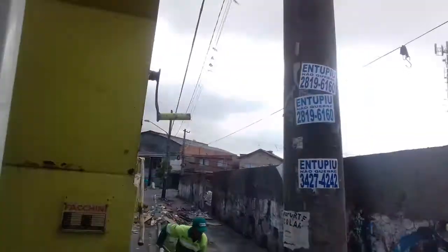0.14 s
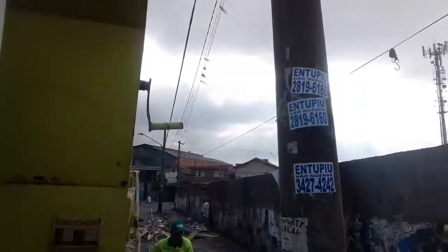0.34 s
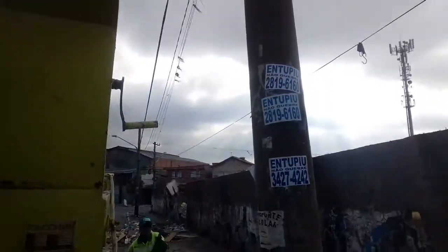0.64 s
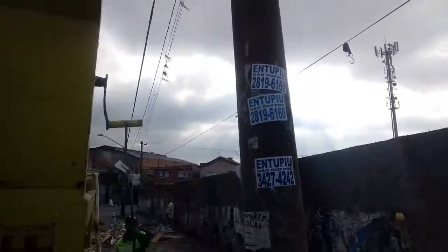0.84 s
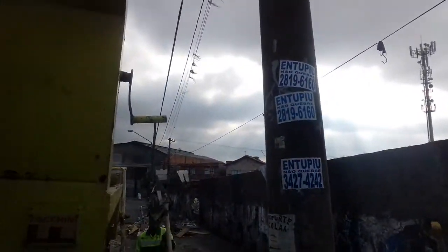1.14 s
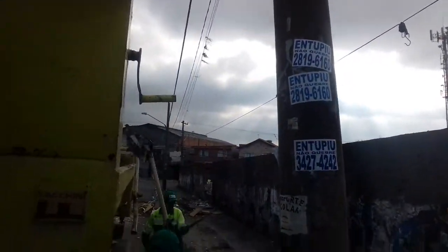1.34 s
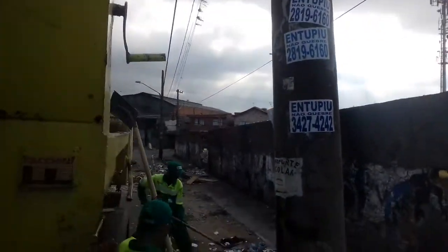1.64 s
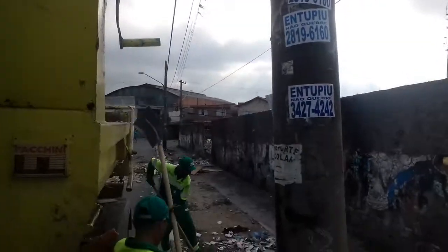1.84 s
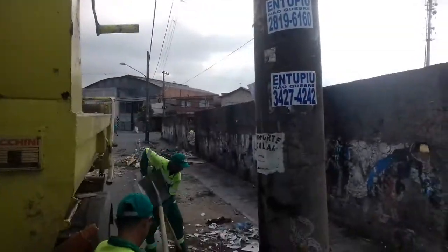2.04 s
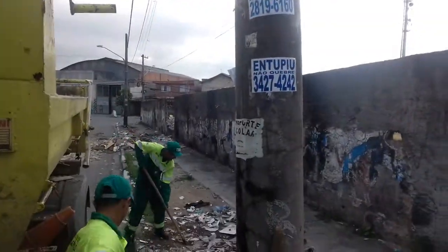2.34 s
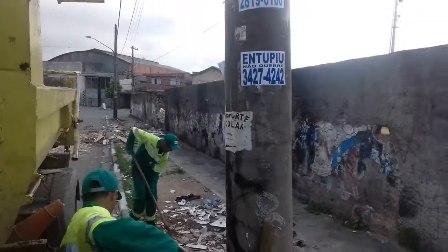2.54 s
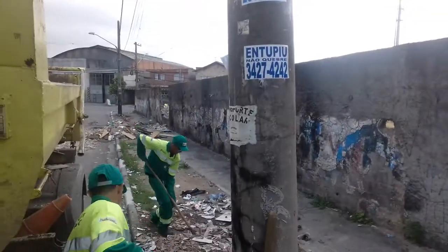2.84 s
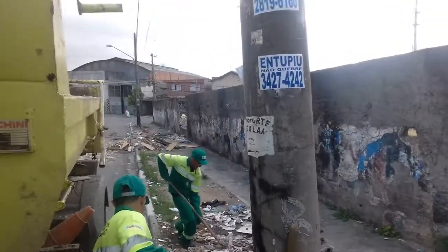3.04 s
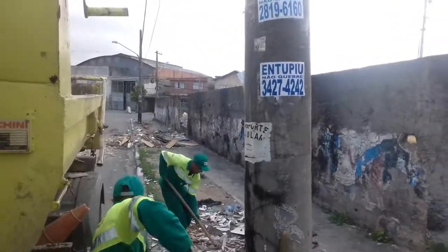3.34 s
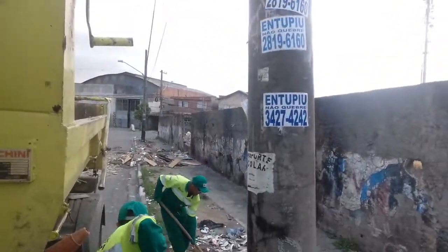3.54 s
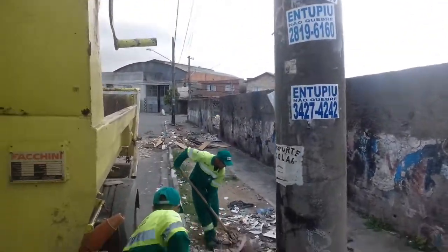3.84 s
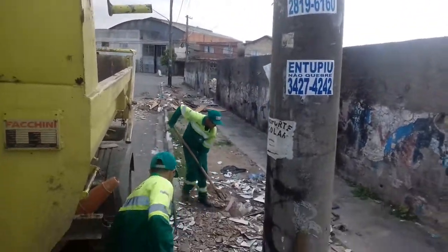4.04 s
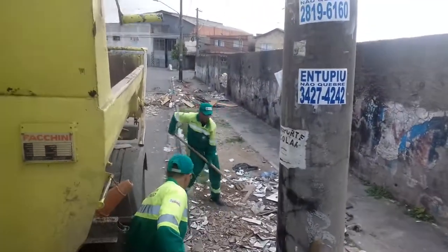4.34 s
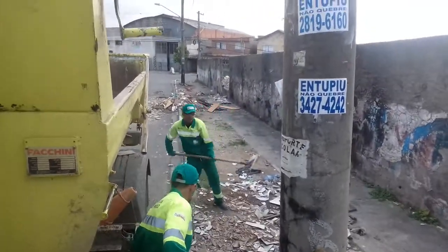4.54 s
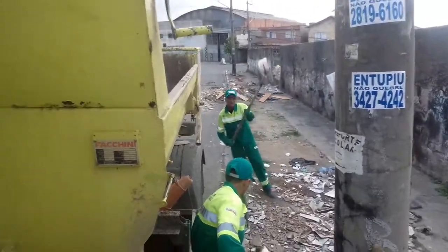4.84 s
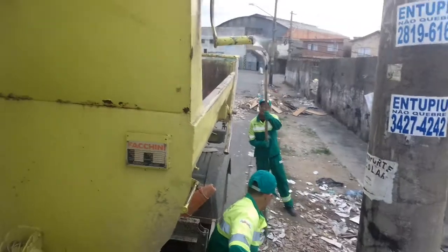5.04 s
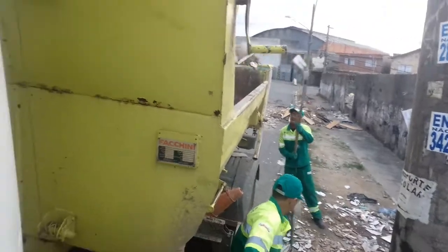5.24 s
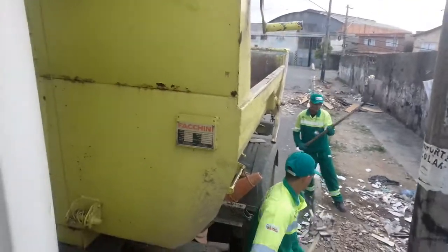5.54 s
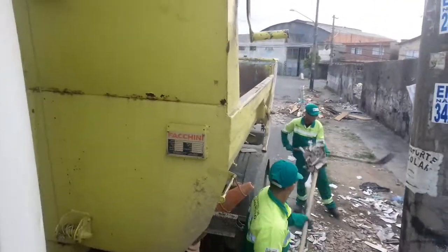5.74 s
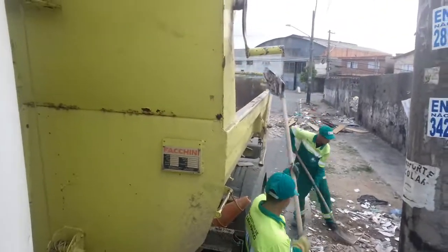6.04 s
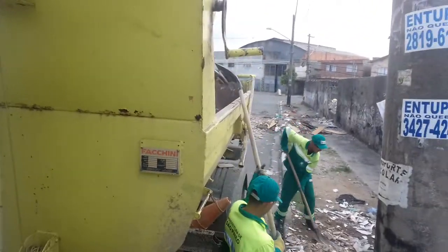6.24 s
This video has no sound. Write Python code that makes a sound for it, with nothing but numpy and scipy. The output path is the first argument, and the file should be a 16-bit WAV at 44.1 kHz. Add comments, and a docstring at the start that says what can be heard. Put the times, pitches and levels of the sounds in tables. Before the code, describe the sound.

Outdoors beside a truck and a wall, soft grit crunches, then tile shards slide and clink and a scrap of metal sings briefly. A shovel blade clangs on the truck's rim and lumps land on steel. Longer rasping scrapes follow, then more clinking shards, and finally scrapes and hollow steel knocks. Wind buffets the single microphone above a faint engine hum and town murmur.

```python
"""Street cleaners scrape up broken tile and rubble and toss it into a steel truck body.
First grit crunches under blades, shards clink and a piece of scrap sings; then a blade clangs and lumps land.
Longer scrapes follow, then sliding shards clink again, and last come more scrapes and lumps on steel.
Scraping is filtered clicks, blows are dying tones and bursts; a wall and the truck's side throw them back.
Throughout, wind made of filtered noise buffets the single microphone and an engine hums faintly."""
import sys
import numpy as np
from scipy import signal
from scipy.fft import rfft, irfft
from scipy.io import wavfile
from scipy.ndimage import uniform_filter1d

SR = 44100
rng = np.random.default_rng(int(sys.argv[2]) if len(sys.argv) > 2 else 0)


def dump_mix(stems):
    """Bounce the given channels to the path in sys.argv[1] as a 16-bit WAV at rate SR."""
    frames = np.atleast_2d(stems).T  # one column per channel
    limited = np.clip(frames, -1, 1)  # hard clip at full scale
    pcm = np.round(limited * 32767).astype(np.int16)
    wavfile.write(sys.argv[1], SR, pcm)


N = 281358
T = np.arange(N) / SR  # time in the scene, s
AGE = T[:SR // 2]  # time since a blow, s

# How the treble of breaking lumps, shards and the far echo is shaped: (pitch_hz, gain_db)
TREBLE = [(200, 3.5), (500, 2), (6000, 1), (7500, -5.5), (9500, -12.5), (15500, -23)]


def undb(db):
    """Turn decibels into gain."""
    return 10 ** (np.asarray(db) / 20)


def unit(x):
    """Scale to an rms (average strength) of 1."""
    return x / np.sqrt(np.mean(x ** 2) + 1e-18)


def onset_unit(x):
    """Scale a blow so that its first hundredth of a second has rms 1."""
    return x / np.sqrt(np.mean(x[:SR // 100] ** 2) + 1e-18)


def add(out, start_s, x):
    """Mix x into out from start_s on."""
    i = max(int(start_s * SR), 0)
    out[i:i + len(x)] += x[:max(N - i, 0)]


def bins(n):
    """Frequencies of an n-point spectrum, raised 1 Hz so that none is zero."""
    return np.arange(n // 2 + 1) * SR / n + 1


def slope(points, hz):
    """Read the gain of a (Hz, dB) curve at the given frequencies."""
    point_hz, point_db = np.transpose(points)
    return undb(np.interp(np.log(hz), np.log(point_hz), point_db))


def colour(x, gain):
    """Filter x with a gain for each frequency, without sounding ahead of the cause."""
    n = len(x)
    cepstrum = irfft(np.log(gain + 1e-6), n)
    # folding the second half onto the first makes the filter respond only after its input
    cepstrum[1:n // 2] *= 2
    cepstrum[n // 2 + 1:] = 0
    return irfft(rfft(x) * np.exp(rfft(cepstrum)), n)


def bell(hz, centre_hz, octaves):
    """The band that a contact excites: hard, small contacts sit higher."""
    return 1 / (1 + (np.log2(hz / centre_hz) / octaves) ** 2)


def walk(rate):
    """Smooth random wander with a spread near 1, from `rate` random steps a second."""
    k = max(int(SR / rate), 2)
    steps = np.repeat(rng.standard_normal(N // k + 1), k)
    return 1.3 * uniform_filter1d(uniform_filter1d(steps, k), k)[:N]


def dying(t60):
    """Decay of a blow, falling by 60 dB in t60 seconds."""
    return np.exp(-np.log(1000) * AGE / t60)


def clicks(n, rate, spread_db):
    """Tiny fractures at random moments, about `rate` a second, mostly small and a few large."""
    happens = rng.random(n) < rate / SR
    sign = rng.choice([-1, 1], n)
    size = undb(spread_db * np.minimum(rng.exponential(size=n), 4))
    return unit(happens * sign * size)


def swells(events, attack_s, arch_db, release_db_per_s):
    """Gain of overlapping (start, length, level) movements: each sets in, arches to its middle and dies away."""
    power = np.zeros(N)
    for start_s, length_s, level_db in events:
        onset = np.clip(1 + (T - start_s) / attack_s, 0, 1)  # rises just ahead of the start
        off_middle = np.clip(2 * (T - start_s) / length_s - 1, -1, 1)
        fade_db = release_db_per_s * np.maximum(T - start_s - length_s, 0)
        power += (onset * undb(level_db - arch_db * off_middle ** 2 - fade_db)) ** 2
    return np.sqrt(power)


def ring(modes, age=AGE):
    """Dying tones (Hz, dB, ring time) after one blow, whose contact lasts a fraction of a millisecond."""
    hz, db, t60 = np.transpose(modes)[:, :, None]
    phase = rng.uniform(0, 2 * np.pi, hz.shape)
    contact = 1 - np.exp(-(age / .0003) ** 2)
    decay = np.exp(-np.log(1000) * age / t60)
    return contact * np.sum(undb(db) * decay * np.sin(2 * np.pi * hz * age + phase), axis=0)


def struck(modes, centre_hz, octaves, longest_s=0.15):
    """An object's tones, weighted by the band that the contact excites and damped by what touches it."""
    heard = []
    for hz, db, t60 in modes:
        excited_db = 20 * np.log10(bell(hz, centre_hz, octaves))
        heard.append((hz, db + excited_db, min(t60, longest_s)))
    return onset_unit(ring(heard))


def crunch(centre_hz, octaves, t60, patchy_db=2, size=45):
    """A lump breaks up: a dying burst of fractures through its own uneven resonances."""
    hz = bins(len(AGE))
    uneven = uniform_filter1d(rng.standard_normal(len(hz)), size)
    own = undb(patchy_db * np.sqrt(size) * uneven)
    burst = clicks(len(AGE), rate=7500, spread_db=4.0) * dying(t60)
    return onset_unit(colour(burst, own * bell(hz, centre_hz, octaves) * slope(TREBLE, hz)))


def shard(hz, t60, age, side_db=-7, scatter=.33, count=5):
    """An irregular piece of tile: one main tone and others, mostly weaker, at unrelated pitches."""
    others = np.minimum(hz * np.exp(.12 + scatter * rng.standard_normal(count)), SR / 2)
    treble_db = 20 * np.log10(slope(TREBLE, others))
    levels = side_db + treble_db + 2 * rng.standard_normal(count)
    modes = [(hz, 0, t60)] + [(f, db, t60) for f, db in zip(others, levels)]
    return onset_unit(ring(modes, age))


def tumbling(rate, centre_hz, scatter, t60):
    """Many small pieces knocking together, each with its own pitch, size and damping."""
    out = np.zeros(N)
    count = int(rate * T[-1])
    for k, (when, pitch, size, damping) in enumerate(rng.uniform(-1, 1, (count, 4))):
        piece_hz = centre_hz * np.exp(scatter * pitch)
        piece = shard(piece_hz, t60 * np.exp(.5 * damping), AGE[:SR // 16], count=2)
        add(out, (k + 2 * when) / rate, undb(7 * size) * piece)
    return unit(out)


def shovelling():
    """A pressed blade sticks and slips over grit and stones; once it is lifted, loose shards tumble and clink."""
    # A shovel or the rake pushed along the pavement, rasp relative to the stroke:
    # (start_s, length_s, level_db, rasp_db)
    scrapes = [(0.01, 0.3, -35.5, -2.5), (0.244, 0.23, -31, -2.5), (1.407, 0.017, -19, -11.5),
               (1.895, 0.022, -21.5, -19), (2.085, 0.86, -38, -4.5), (2.24, .13, -24.5, -2),
               (2.745, 0.069, -20, -10.5), (2.815, .23, -16, -4.5), (3.085, 0.32, -26, -3.5),
               (3.388, 0.068, -19, -1.5), (3.51, 0.39, -20.5, -1.5), (3.59, 0.12, -14, -0.5),
               (3.732, 0.072, -15, -1), (5.231, 0.082, -20, -9), (5.496, 0.072, -28, -3),
               (5.69, 0.34, -35, -7), (6.139, .06, -36, 5), (6.292, 0.27, -30, -1)]
    # Loose rubble sliding off a blade or settling: (start_s, length_s, level_db)
    spills = [(0.01, 0.09, -35), (.18, 0.11, -25), (.31, 0.44, -20), (.79, .08, -19), (.92, .17, -27),
              (1.46, 0.32, -30.5), (3.98, 0.02, -21), (4.1, 0.02, -20.5), (4.18, 0.48, -32.5),
              (4.47, 0.28, -30.5), (4.745, 0.12, -19.5), (4.87, 0.28, -22)]
    # Resonances of a blade pressed on the pavement: (pitch_hz, width_hz, strength_db)
    pressed = [(850, 250, -24.5), (1354, 330, -7.5), (1850, 170, -5.5), (2840, 74, -5), (4106, 400, 11.5),
               (4680, 210, 3)]
    # Tone colours of crunching grit, rasping blade and fine sand: (pitch_hz, gain_db)
    grit_curve = [(1200, -19.5), (2200, -3.5), (3100, -5.5), (4000, -6), (5900, 2), (7200, -8), (9000, -15),
                  (12000, -25.5)]
    rasp_curve = [(120, -53), (300, -15), (600, 4.5), (1200, 5), (2000, 2.5), (3000, 2.5), (5000, -20.5)]
    sand_curve = [(6000, -14), (8000, 13), (9500, 0.5), (12000, 2.5), (15500, -3.5)]

    stroke = dict(attack_s=0.036, arch_db=4.0, release_db_per_s=169)
    push = swells([(s, length, db) for s, length, db, _ in scrapes], **stroke)
    press = swells([(s, length, db + rasp_db) for s, length, db, rasp_db in scrapes], **stroke)
    spill = swells(spills, attack_s=0.063, arch_db=2.0, release_db_per_s=192)

    hz = bins(N)
    slips = undb(2.63 * walk(55) + 1.0 * walk(220))  # uneven strength as the blade sticks and slips
    steel = 1 + sum(2 * undb(db) / (1 + (2 * (hz - f) / width) ** 2) for f, width, db in pressed)
    grit = unit(colour(clicks(N, rate=4500, spread_db=0.5), slope(grit_curve, hz) * np.sqrt(steel)))
    rasp = unit(colour(clicks(N, rate=2500, spread_db=3.5), slope(rasp_curve, hz) * steel))
    rasp = rasp * undb(2.85 * walk(35))
    sand = unit(colour(clicks(N, rate=8100, spread_db=6.0), slope(sand_curve, hz)))
    stones = tumbling(rate=300, centre_hz=1300, scatter=.45, t60=.025)
    shards = tumbling(rate=250, centre_hz=4950, scatter=.42, t60=.035)
    under_blade = undb(-1.5) * (rasp + 0.34 * stones)

    gritty_push = undb(-1.0) * push * grit
    sandy_push = undb(-4) * push ** 1.55 * sand  # sand grows faster than the stroke's level
    scraping = slips * (gritty_push + sandy_push + press * under_blade)
    scraping = scraping + undb(-7.5) * push * shards
    sliding = slips * (undb(-5.5) * grit + undb(-15.5) * under_blade)
    spilling = spill * (undb(-2.5) * shards + sliding)
    return scraping + spilling


def clinking_tile():
    """Shards chatter into full sound, ringing at unrelated pitches while chips break off."""
    # Shards that clink: (start_s, relative level_db, main pitch_hz, ring_s)
    clinks = [(0.249, -19, 6050, .06), (.379, -20, 6100, 0.025), (0.524, -19, 6100, 0.083),
              (0.571, -13, 4300, 0.1), (0.597, -9, 3990, 0.032), (0.626, -14, 6090, 0.11),
              (0.705, -12, 6780, 0.03), (0.785, -8, 5180, 0.028), (0.864, -12.5, 5220, 0.053),
              (.939, -15, 4950, 0.035), (0.952, -11.5, 3950, 0.019), (1.118, -12.5, 3986, 0.028),
              (1.234, -25.5, 4280, 0.087), (1.315, -22, 4400, 0.091), (1.327, -33, 3210, 0.047),
              (1.402, -22, 6020, .06), (1.427, -10.5, 5425, 0.033), (4.087, -16.5, 3086, 0.058),
              (4.115, -19, 5630, 0.042), (4.293, -25, 7070, 0.036), (4.4, -24.5, 4530, 0.036),
              (4.752, -13, 4630, 0.042), (4.91, -17.5, 4330, 0.11), (5.083, -16.5, 4280, 0.15),
              (5.093, -12, 6010, 0.05), (5.208, -16, 4900, 0.06), (5.391, -25, 5340, 0.045),
              (6.361, -21.5, 4920, 0.024)]
    out = np.zeros(N)
    rise = 1 - np.exp(-AGE / 0.0015)  # builds up over about 1.5 ms
    for start_s, level_db, hz, t60 in clinks:
        chips = undb(-10) * crunch(hz, octaves=.4, t60=.05)
        add(out, start_s, undb(level_db + 0.5) * rise * (shard(hz, t60, AGE) + chips))
    return out


def rubble_on_steel():
    """Lumps crunch as they land and set the steel truck body ringing."""
    # Lumps that knock on steel, steel relative to the crunch:
    # (start_s, level_db, centre of the colour_hz, crunch decay_s, steel_db)
    crashes = [(.441, -19, 2500, .1, 0), (1.1087, -16, 2920, 0.14, -1.5), (1.578, -14, 4940, 0.15, -1),
               (1.61, -22.5, 630, 0.3, -21), (1.878, -14.5, 6000, 0.17, -12.5),
               (2.037, -30.5, 2370, 0.056, -18), (2.153, -25, 1750, 0.2, -17),
               (2.186, -19.5, 3240, 0.22, -28), (2.28, -26.5, 1100, 0.34, -11),
               (2.84, -16.5, 2600, 0.4, -7), (2.925, -16.5, 1450, 0.53, 3.5), (3.642, -19, 1060, 0.17, 2),
               (4.059, -20, 4330, 0.2, -23), (5.488, -23.5, 3200, 0.11, -23), (5.594, -14, 3480, 0.12, -29),
               (5.613, -13.5, 5800, 0.25, -24), (5.88, -29.5, 790, 0.64, -20), (5.917, -15, 1980, 0.17, 2),
               (6.007, -17.5, 1120, 0.18, -1.5), (6.21, -24, 2480, 0.11, -26),
               (6.227, -16, 4200, 0.086, -25), (6.24, -24, 1150, 0.13, 2), (6.326, -31.5, 488, 0.43, 10)]
    # Tones of the truck body, before damping: (pitch_hz, level_db, ring_s)
    body = [(549, 1, 0.13), (1020, 5, 0.051), (1114, 3, 0.18), (1514, -2.5, 0.094), (1836, -8.5, 0.62),
            (2297, 1.5, 0.076), (2490, 1, 0.042), (3746, 8.5, 0.077)]
    out = np.zeros(N)
    for start_s, level_db, hz, t60, steel_db in crashes:
        lump = crunch(hz, octaves=1.41, t60=t60)
        steel = undb(steel_db) * struck(body, hz, octaves=0.42)
        add(out, start_s, undb(level_db) * (lump + steel))
    return out


def clanging_blade():
    """A shovel blade rings in its own tones as it hits the truck's rim."""
    # Blows on the rim: (start_s, level_db, centre of the colour_hz, longest ring_s)
    clangs = [(1.562, -15.5, 3850, 0.028), (1.575, -8.5, 4540, .6), (1.765, -20, 7840, 0.07)]
    # Tones of the blade, before damping: (pitch_hz, level_db, ring_s)
    blade = [(2460, 3.5, 0.23), (3250, -3, 0.071), (3406, 10, 0.098), (3737, 5, 0.23), (4100, 11, 0.16),
             (4300, 3, 0.14), (4930, -21, .6), (6480, 6, 0.076), (7074, 14, 0.11), (8000, -3, .12),
             (9640, -10, 0.29), (11400, -13, 0.14)]
    out = np.zeros(N)
    for start_s, level_db, hz, longest_s in clangs:
        add(out, start_s, undb(level_db) * struck(blade, hz, octaves=1.1, longest_s=longest_s))
    return out


def singing_scrap():
    """A piece of scrap metal lands, tips over and sings in its own tones."""
    # Blows of the piece: (start_s, level_db, centre of the colour_hz, width of the colour_octaves)
    hits = [(.786, -16.5, 7000, 1.0), (.812, -24.5, 2130, .4)]
    # Tones of the piece: (pitch_hz, level_db, ring_s)
    scrap = [(2126, -8, .5), (2140, -14, .15), (4770, -3, .3), (5222, 0, .35), (5290, -3, .25),
             (8102, -8, .22), (10800, -14, .22), (12000, -15, .1)]
    out = np.zeros(N)
    for start_s, level_db, hz, octaves in hits:
        add(out, start_s, undb(level_db) * struck(scrap, hz, octaves, longest_s=.5))
    return out


def walls(x, near_db=-4, near_t60=0.073, far_db=-19, far_t60=0.1, shift_rate=1.302):
    """Quick reflections between truck and wall, shifting as the workers move, then a faint, duller street tail."""
    bounces = []
    for _ in range(2):
        near = clicks(len(AGE), rate=2500, spread_db=2.5) * dying(near_t60) * (AGE > .003)
        bounces.append(signal.fftconvolve(x, near / np.linalg.norm(near))[:N])
    place = np.pi * walk(shift_rate)  # wanders between the two sets of reflections
    close = np.cos(place) * bounces[0] + np.sin(place) * bounces[1]
    far = rng.standard_normal(len(AGE)) * dying(far_t60) * (AGE > .025)
    far = colour(far, slope(TREBLE, bins(len(AGE))))
    tail = signal.fftconvolve(x, far / np.linalg.norm(far))[:N]
    return undb(-2.11) * (x + undb(near_db) * close + undb(far_db) * tail)


def wind():
    """Eddies tumble over the microphone port in uneven puffs; the harder ones reach higher in pitch."""
    # Gusts at the microphone: (start_s, length_s, relative level_db)
    gusts = [(0.01, .25, -31), (.31, 0.24, -18.5), (.6, 0.36, -38), (1.05, 0.15, -27), (1.25, 0.36, -36.5),
             (1.61, .18, -26.5), (1.89, 0.044, -38), (3.31, 0.14, -24.5), (3.5, 0.086, -33.5),
             (3.89, 0.21, -23), (4.2, 0.083, -44), (4.39, 0.052, -31.5), (4.54, 0.067, -30.5),
             (4.76, 0.12, -32), (4.97, 0.18, -35.5), (5.31, .12, -47), (5.49, 0.093, -26.5),
             (5.66, 0.17, -34.5), (5.95, .18, -26.5), (6.26, 0.23, -35)]
    # Single hard buffets: (start_s, relative level_db)
    buffets = [(0.125, -10.5), (0.189, -17), (0.363, -22), (0.389, -16), (0.42, -8), (1.054, -10),
               (1.071, -10.5), (1.145, -14), (1.669, -11), (1.708, -10.5), (3.529, -13), (4.072, -12),
               (4.381, -23), (5.969, -14.5), (6.095, -21)]
    # Tone colours of the low rumble and the higher flutter: (pitch_hz, gain_db)
    rumble_curve = [(25, -24), (55, -13), (100, 2), (190, 1), (270, -4), (450, -15.5), (900, -65)]
    flutter_curve = [(120, -33.5), (300, 6), (480, 0.5), (900, -15), (2000, -47)]

    breeze = undb(-57)  # the air between gusts
    blowing = breeze + swells(gusts, attack_s=0.058, arch_db=4.5, release_db_per_s=260)
    force = blowing * unit(undb(4.8 * walk(110)))
    for start_s, level_db in buffets:
        swell = AGE / 0.0037  # a buffet peaks after 3.7 ms
        add(force, start_s, undb(level_db - 6.5) * swell * np.exp(1 - swell))
    hz = bins(N)
    rumble = colour(force * rng.standard_normal(N), unit(slope(rumble_curve, hz)))
    # flutter grows faster than the force of the wind
    flutter = colour(force ** 1.76 * rng.standard_normal(N), unit(slope(flutter_curve, hz)))
    return rumble + undb(5.0) * flutter


def engine():
    """An idling engine hums in a few faint tones whose pitch and level waver."""
    # Tones of the hum, around which they waver: (pitch_hz, level_db)
    tones = [(134, -57), (280, -82)]
    hum = np.zeros(N)
    for hz, level_db in tones:
        level = undb(level_db + 3.2 * walk(25)) * np.sqrt(2)
        turns = np.cumsum(hz * (1 + 0.0189 * walk(13))) / SR
        hum += level * np.sin(2 * np.pi * turns)
    return hum


def town():
    """The murmur of the town: coloured noise whose level wanders a little."""
    # Tone colour of the murmur: (pitch_hz, gain_db)
    murmur_curve = [(25, -20), (70, 9.5), (130, -7), (300, 1.5), (1500, 5), (2700, -1.5), (5800, 1.5),
                    (9000, -17), (15000, -38)]
    air = unit(colour(rng.standard_normal(N), slope(murmur_curve, bins(N))))
    return undb(-40.0 + 2.3 * walk(4.97)) * air


def scene():
    """Everything reaches one microphone, so both channels are alike."""
    blows = clinking_tile() + rubble_on_steel() + clanging_blade() + singing_scrap()
    mono = walls(shovelling() + blows) + wind() + engine() + town()
    return np.array([mono, mono])


def record(dry):
    """The recorder rounds the highest peaks and cuts the top."""
    top_hz = 15850
    rounded = dry / (1 + dry ** 6) ** (1 / 6)
    return signal.sosfilt(signal.ellip(10, .2, 80, top_hz, fs=SR, output="sos"), rounded)


dry = scene()
out = record(dry)
dump_mix(out)
```